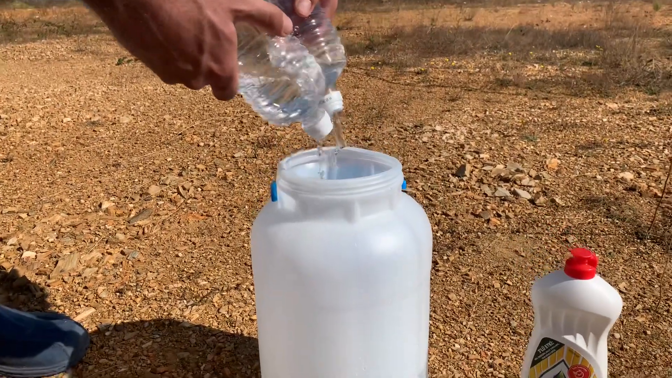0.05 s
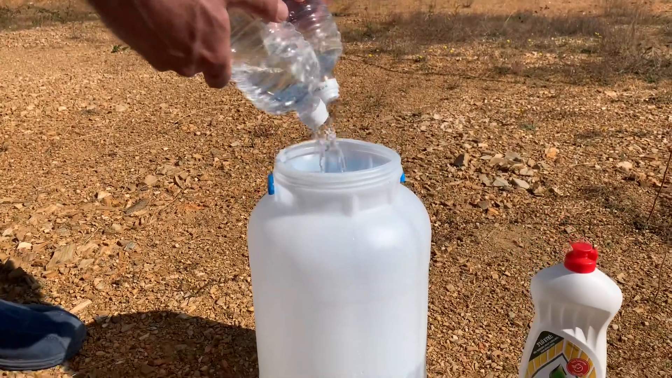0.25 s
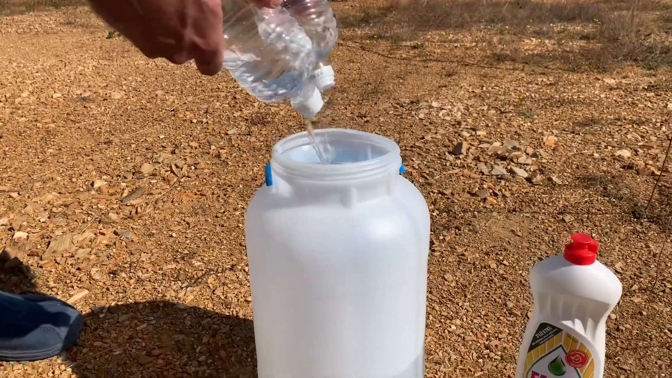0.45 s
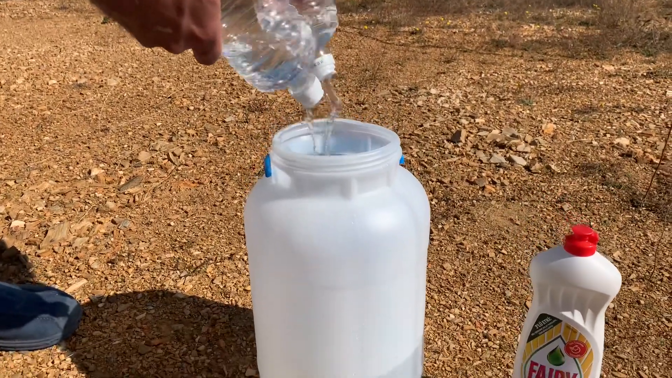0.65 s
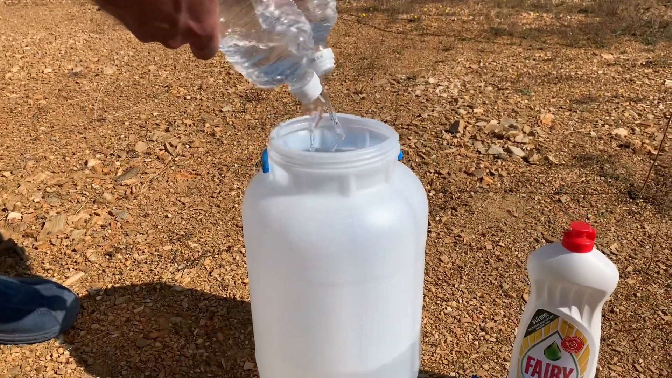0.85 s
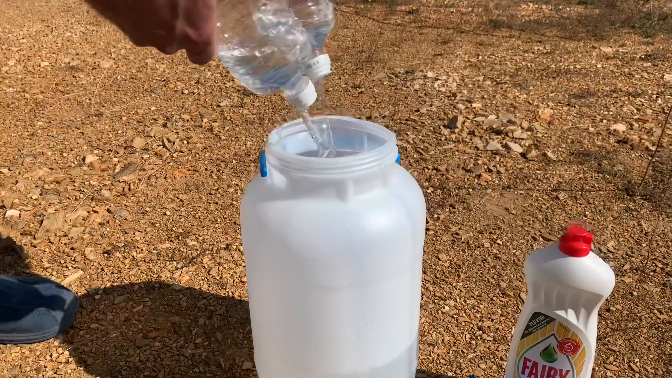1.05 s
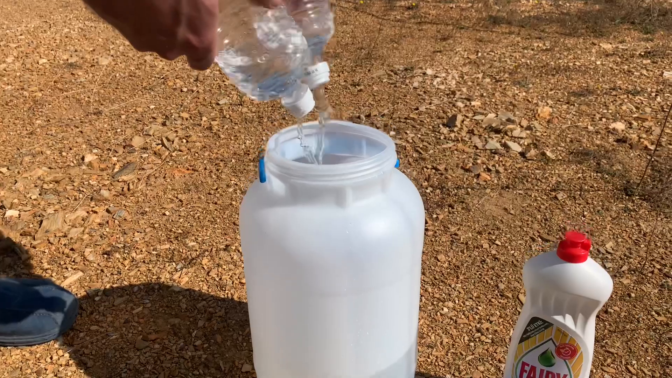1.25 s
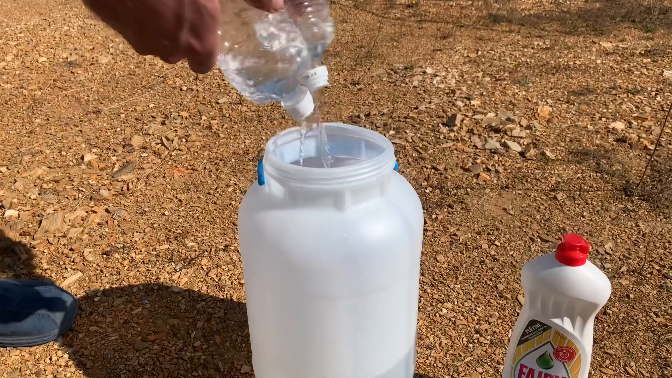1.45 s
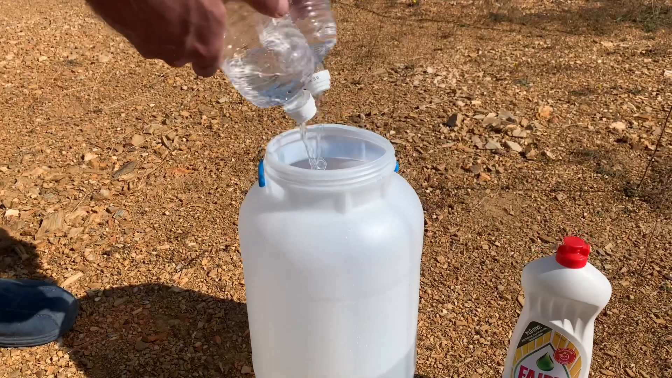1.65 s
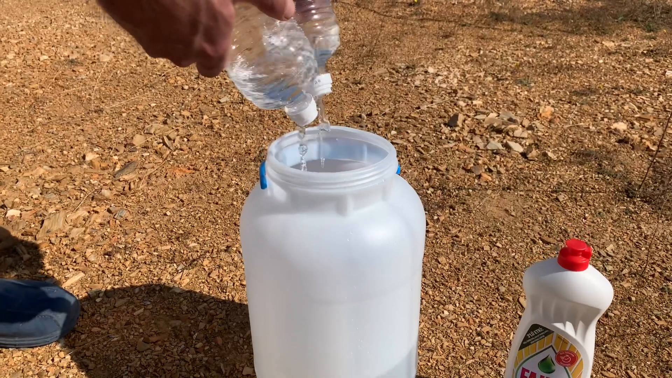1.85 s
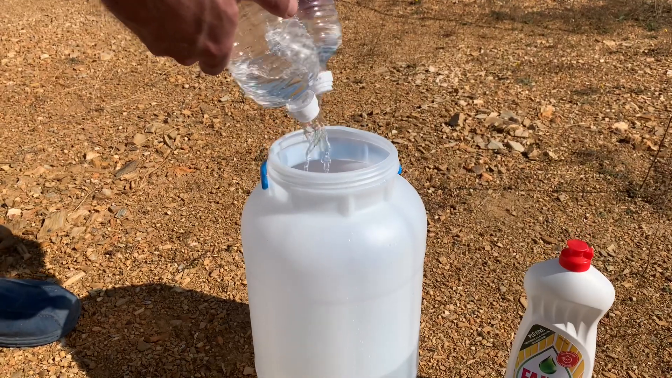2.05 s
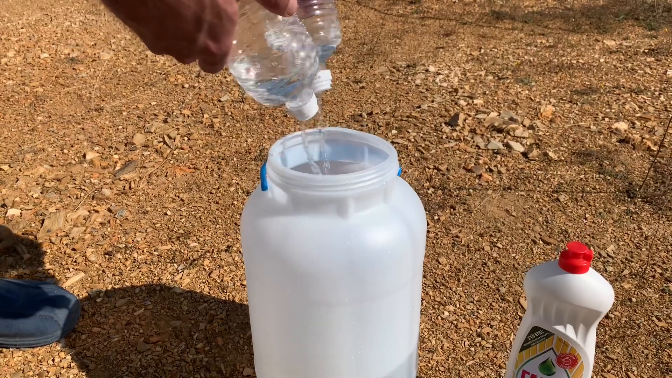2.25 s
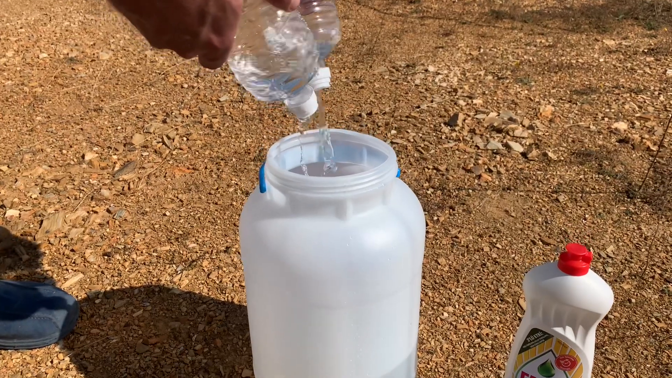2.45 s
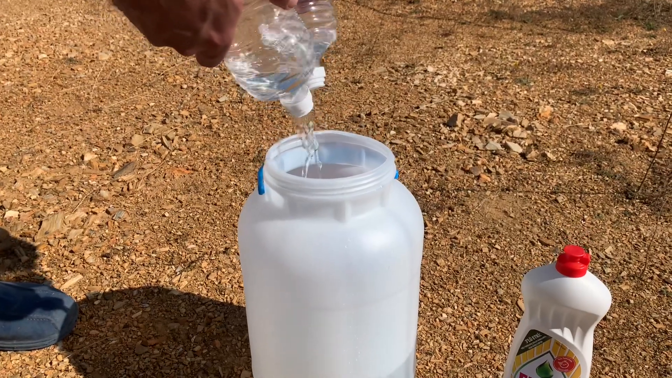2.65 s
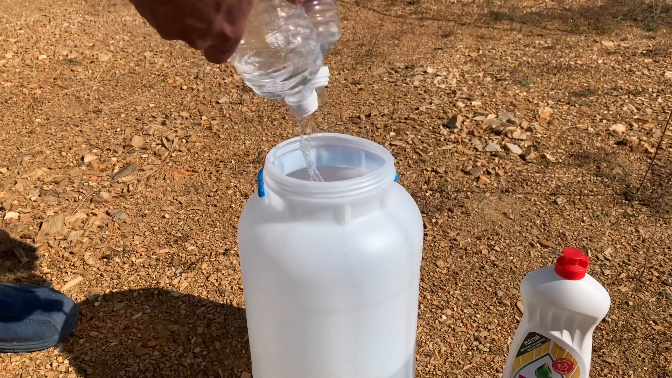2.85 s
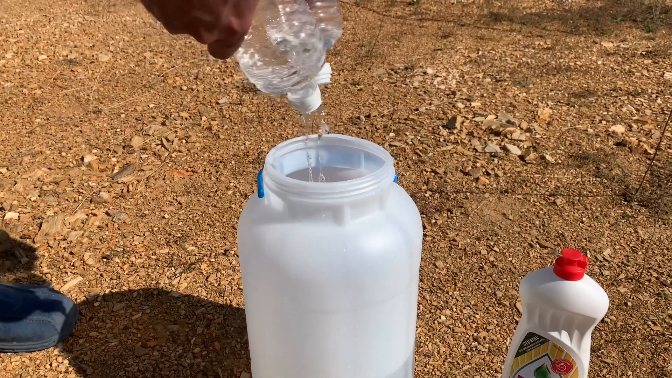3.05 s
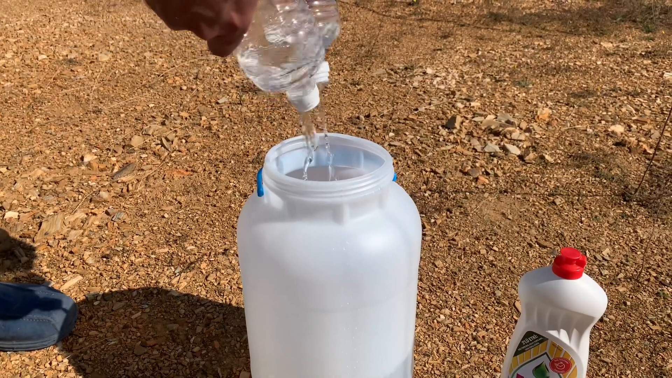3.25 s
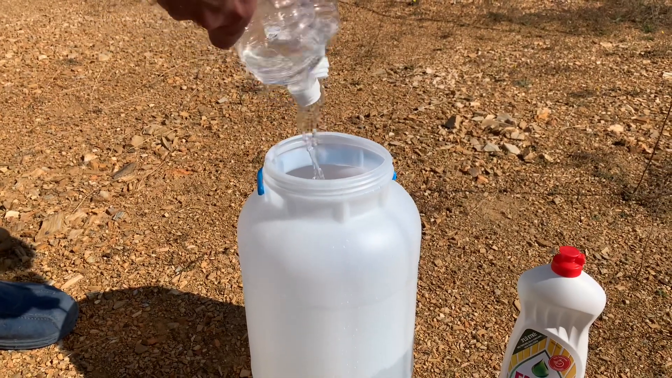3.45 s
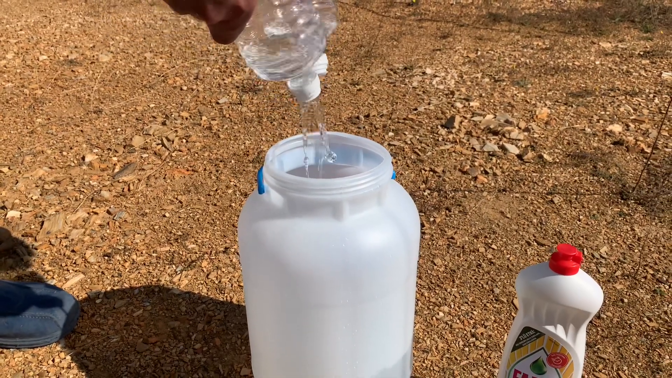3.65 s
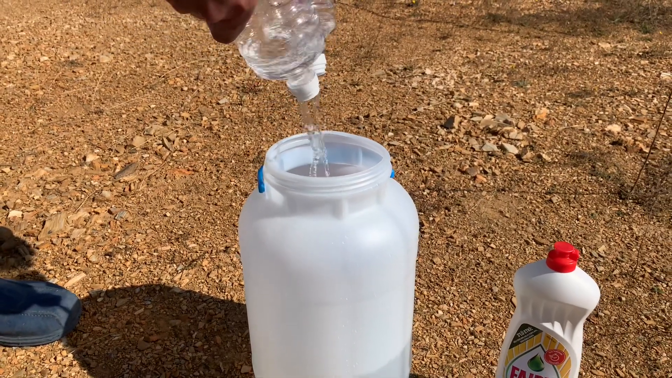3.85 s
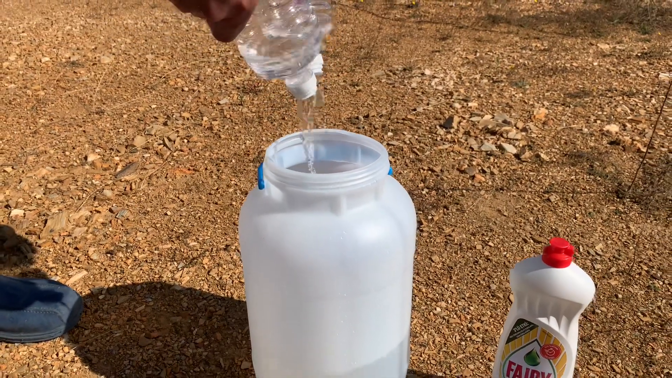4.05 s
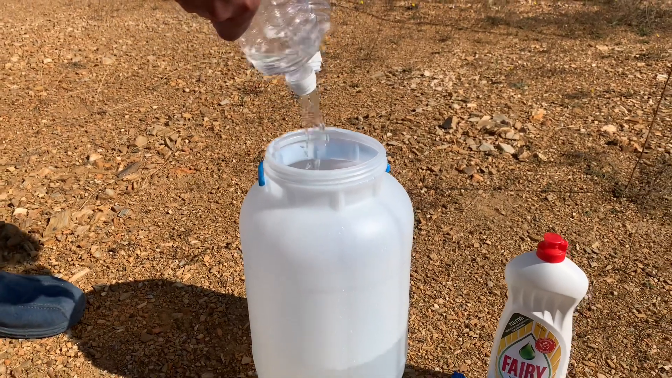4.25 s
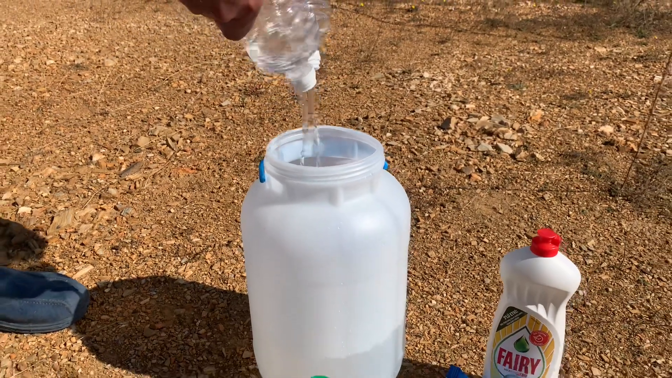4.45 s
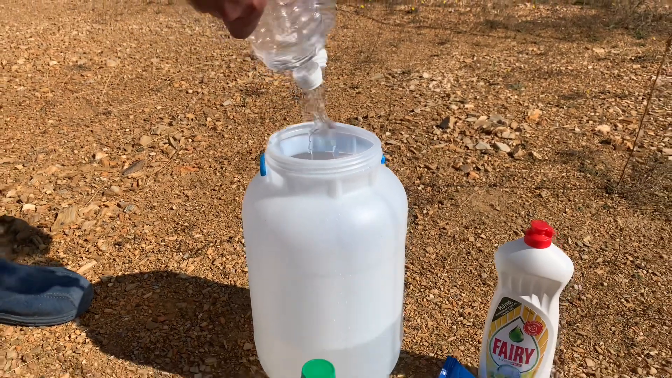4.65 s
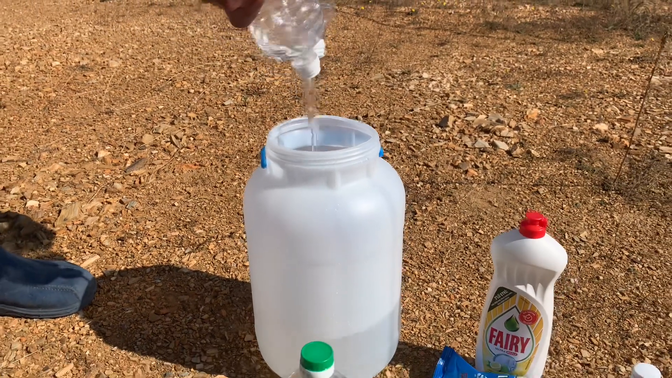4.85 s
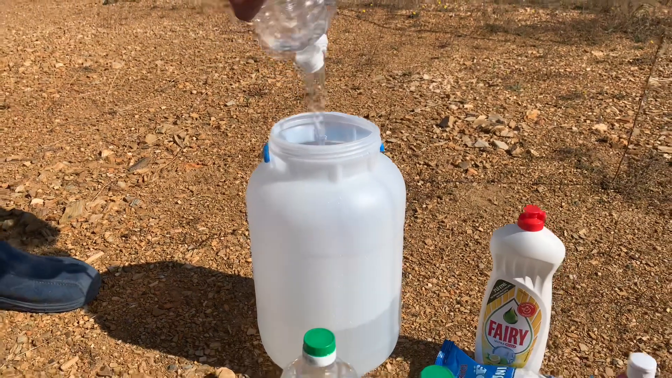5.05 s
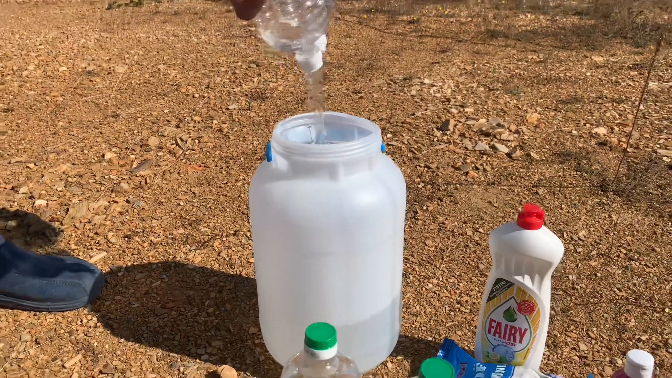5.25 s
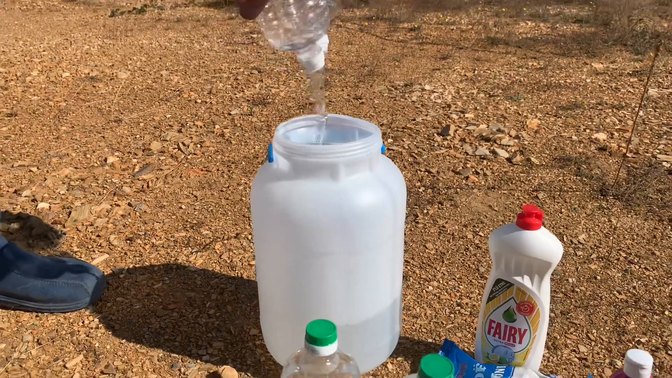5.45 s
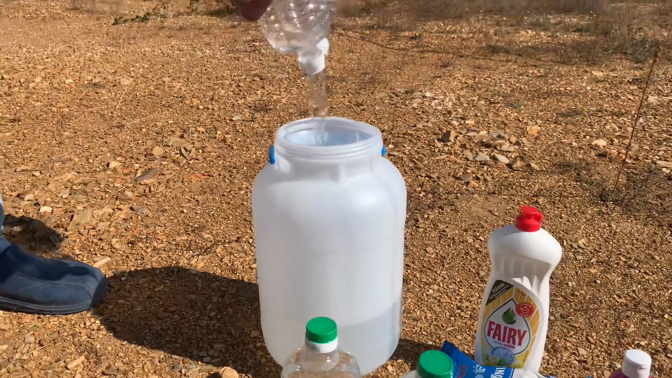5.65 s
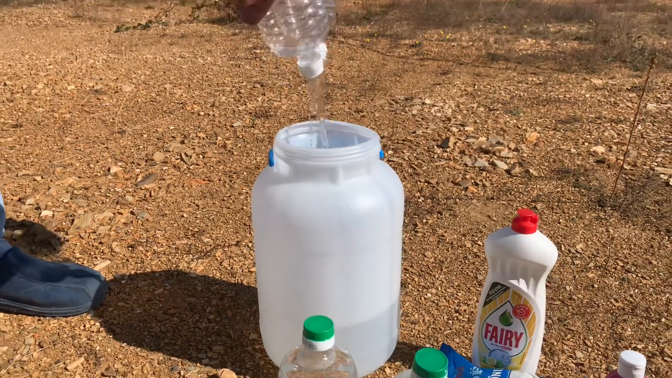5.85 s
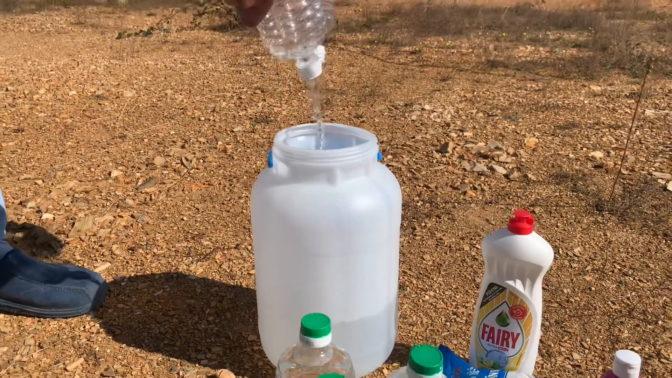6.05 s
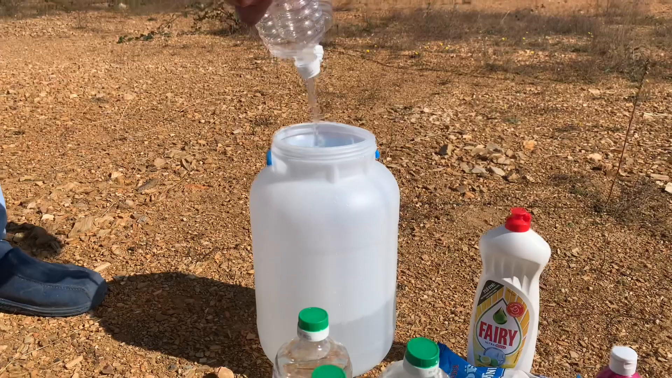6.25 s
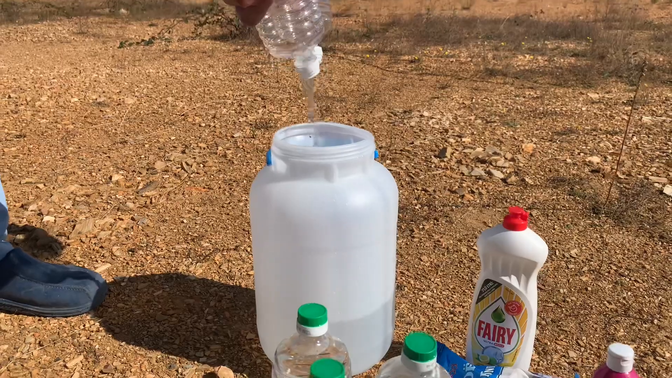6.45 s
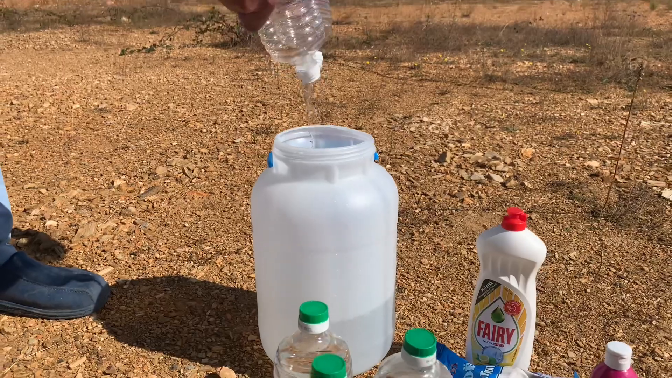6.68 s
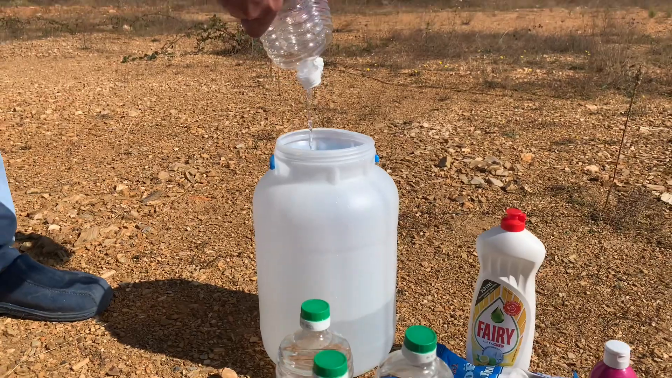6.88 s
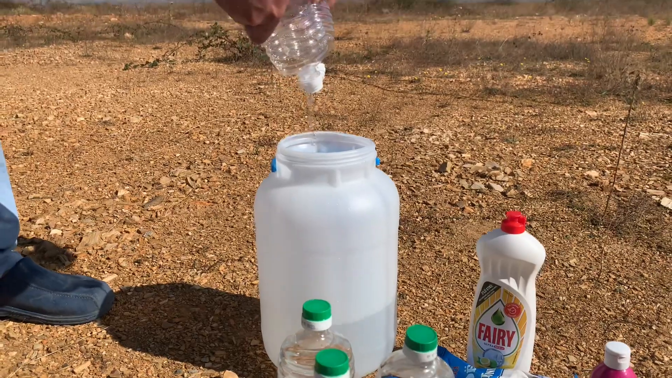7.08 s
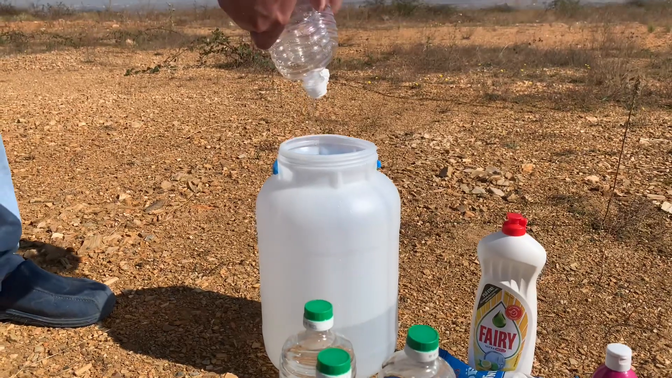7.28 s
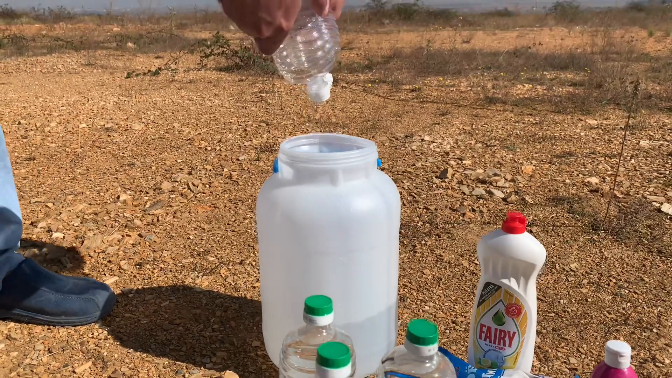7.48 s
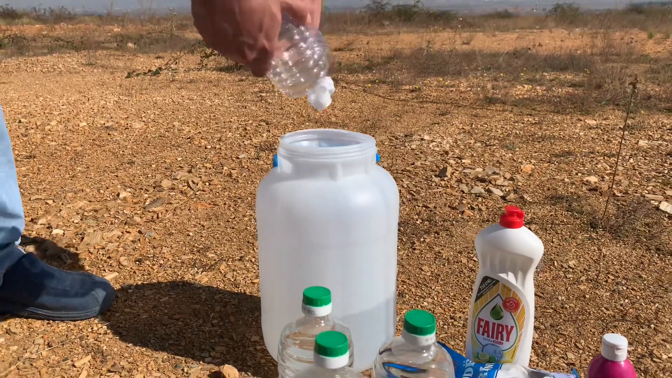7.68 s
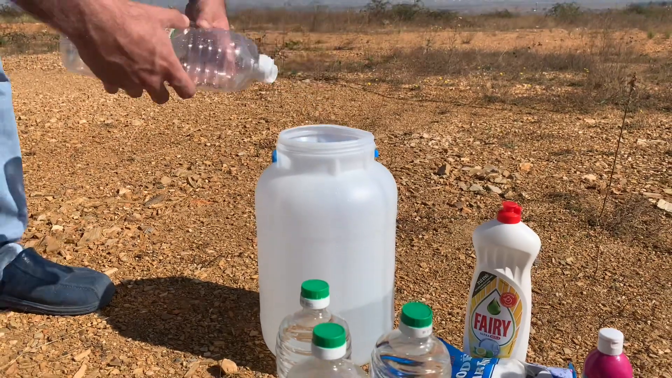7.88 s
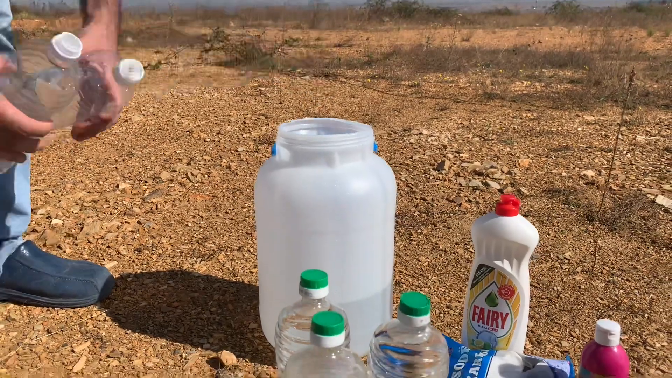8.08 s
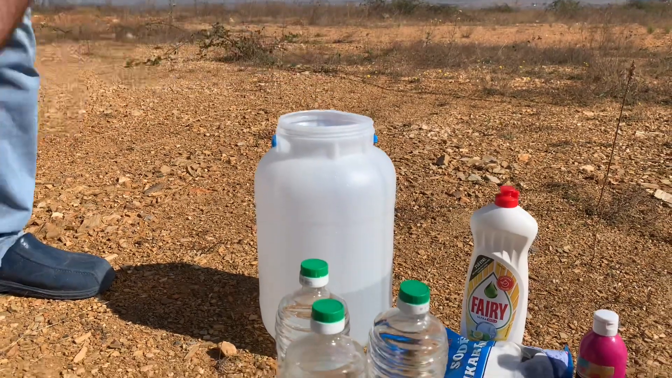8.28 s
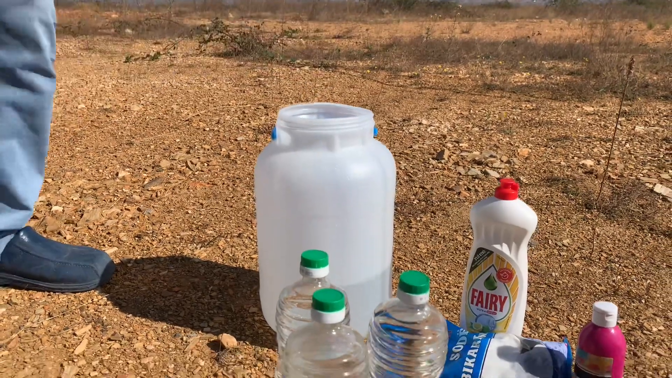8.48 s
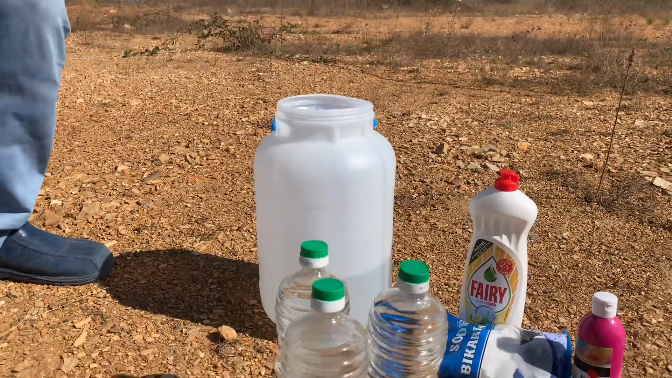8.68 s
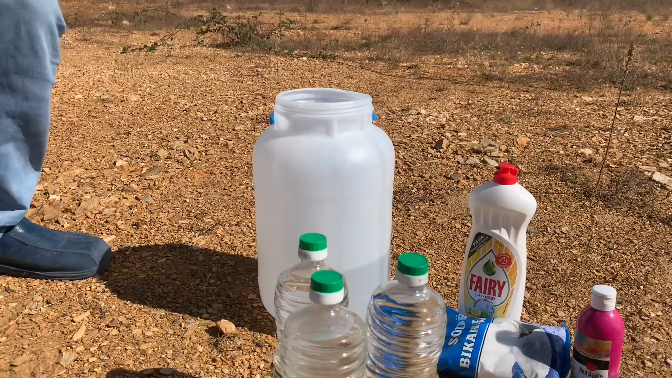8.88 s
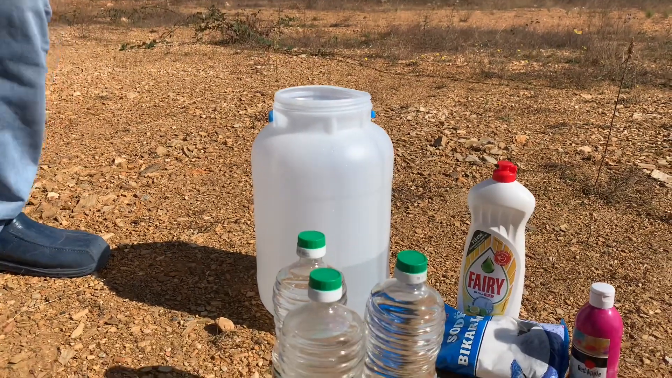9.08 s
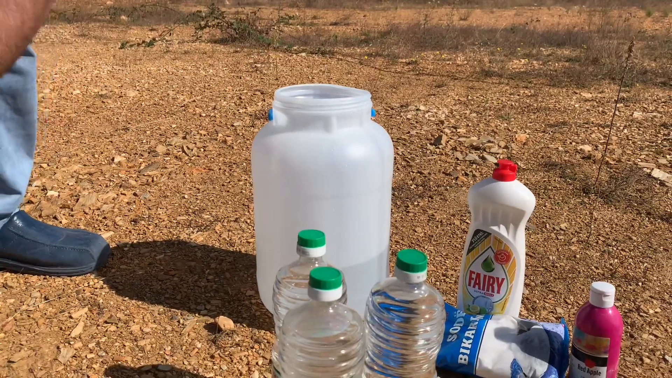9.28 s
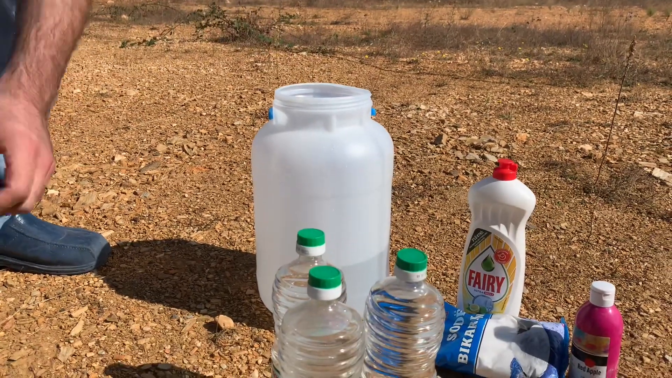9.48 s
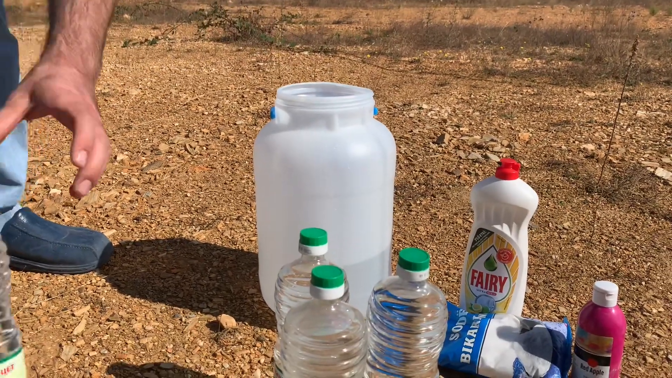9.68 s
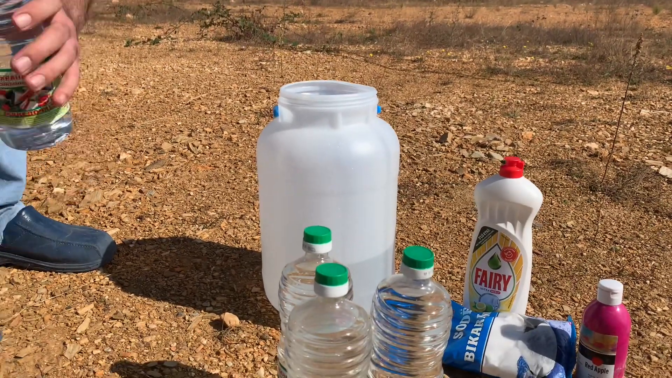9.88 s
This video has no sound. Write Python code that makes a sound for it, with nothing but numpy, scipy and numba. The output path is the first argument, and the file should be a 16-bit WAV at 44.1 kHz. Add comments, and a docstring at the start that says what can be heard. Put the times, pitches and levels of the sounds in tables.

```python
"""Outdoors in a light breeze, water pours from a plastic bottle into a big plastic jug on stony ground. The
stream gulps, splashes as noise bursts and traps bubbles: short gliding sines that ring in the jug's hollow. It
sags, then thins to drips of splattering grit. The last water sloshes in the bottle and shoes grind gravel, as
shaped noise, while the bottle crackles, then drops and bounces with cracks of noise and decaying modes. Soft
low bumps, short decaying sines, come now and then, most of them near the end."""
import sys
import numpy as np
from scipy import signal
from scipy.fft import rfft, irfft
from scipy.io import wavfile
from scipy.ndimage import uniform_filter1d
from numba import njit

SR = 44100
rng = np.random.default_rng(int(sys.argv[2]) if len(sys.argv) > 2 else 0)


def int16_out(signal):
    """Quantize to a 16-bit WAV file."""
    q = np.round(np.clip(np.atleast_2d(signal).T, -1, 1) * 32767)
    wavfile.write(sys.argv[1], SR, q.astype(np.int16))


N = 437472
T = np.arange(N) / SR

# Levels in the tables are mix settings; the functions trim, colour and echo them further.
# loudest bubbles: (time [s], pitch [Hz], level [dB], glide [octaves/s])
BUBBLES = [(.077, 565, -30.5, -20), (.123, 2126, -26, -6), (.142, 550, -34, -40), (0.175, 452, -29.5, -4),
           (.179, 1960, -32, -1), (.297, 564, -36, 10), (.487, 870, -33, 7), (.564, 2070, -30.5, -2),
           (0.798, 890, -31.5, 9), (.883, 2150, -31, -2), (.932, 2470, -28, 3), (.312, 902, -30, 4.5),
           (0.341, 427, -29, 1), (.444, 1920, -23.5, 23), (0.521, 346, -33.5, 17), (.802, 543, -29.5, 9),
           (.912, 773, -24.5, 5), (1.066, 720, -27, 12.5), (1.296, 350, -33.5, 3), (1.409, 535, -30.5, -39),
           (1.55, 1710, -23.5, 29), (1.303, 940, -33, 4), (1.372, 4840, -26, -1), (1.547, 710, -31, 5),
           (1.657, 2960, -29, 5), (1.695, 870, -21.5, 6.5), (1.727, 658, -28, 3), (1.769, 1357, -27.5, 4),
           (1.845, 522, -23.5, 16), (1.958, 2170, -28.5, -21), (2.1, 2140, -31.5, 5), (2.453, 1880, -36, 1),
           (2.522, 2180, -29.5, 6), (2.204, 930, -33, 21), (2.344, 2070, -30, 3), (2.383, 740, -24, -25),
           (2.398, 974, -26.5, 0.5), (2.6, 366, -28.5, 1), (2.815, 945, -31, -15), (2.673, 5960, -26, 5),
           (2.781, 3800, -28.5, -3), (3.06, 384, -34.5, -8), (3.134, 1825, -24, 52), (3.21, 546, -28, 8.5),
           (3.333, 443, -33, 11), (3.729, 1920, -29.5, -5), (3.913, 3740, -25.5, 7), (4.05, 402, -33, -5),
           (4.095, 3600, -30.5, 2), (3.646, 366, -31.5, -3), (3.804, 646, -31.5, 9),
           (3.913, 2440, -26.5, 1), (3.953, 860, -31.5, 10), (4.162, 1140, -35, 12),
           (4.772, 498, -28.5, -14), (4.923, 1280, -27.5, 14), (4.483, 2120, -30, 2), (4.673, 3870, -25, 9),
           (4.727, 1095, -29.5, 2), (4.97, 3680, -26, 12), (5.01, 560, -32.5, -24), (5.173, 2130, -33, -1),
           (5.455, 3450, -27, 8), (5.492, 1421, -31.5, -3), (5.67, 1410, -30.5, 10),
           (5.93, 1080, -34.5, 15), (4.484, 900, -31.5, 5), (4.935, 608, -27, 7.5), (5.378, 843, -32.5, -3),
           (5.654, 825, -29, 12.5), (5.82, 450, -33.5, 6.5), (5.856, 996, -23.5, 2.5),
           (5.856, 1360, -24, -5), (6.141, 850, -31.5, 14.5), (6.328, 812, -34, 16), (6.554, 790, -36, 10),
           (6.685, 824, -35, 21), (6.115, 3570, -23, 15), (6.313, 1420, -32.5, 0), (6.511, 1610, -36.5, 10),
           (6.935, 523, -36, 9), (6.89, 1650, -41, -12), (6.696, 890, -40, 0), (6.804, 737, -41, 17),
           (6.378, 2240, -38, 14), (6.918, 794, -34.5, -2), (7.114, 590, -27, 21.5), (7.162, 855, -39, -10),
           (7.196, 900, -39, 8), (7.332, 1005, -36.5, 3)]
# loudest lumps of water that slap the surface: (time [s], spray level [dB], slap level [dB])
SPLASHES = [(0.298, -40, -30.5), (0.533, -47, -30), (0.652, -33, -48), (0.91, -32, -28), (0.96, -32.5, -40),
            (1.299, -36.5, -65), (1.367, -33.5, -55), (1.587, -23.5, -57), (1.63, -30.5, -55),
            (1.776, -33.5, -36.5), (1.845, -36.5, -51), (1.958, -32, -67), (2.202, -32.5, -34),
            (2.341, -35, -63), (2.472, -32, -65), (2.546, -31, -34.5), (2.671, -29, -47), (2.889, -29, -62),
            (3.046, -35.5, -33), (3.138, -40, -44), (3.209, -29.5, -64), (1.067, -55, -41),
            (3.284, -31.5, -34.5), (3.336, -34.5, -45), (3.435, -41, -32), (3.588, -35, -32),
            (3.673, -29, -35.5), (3.915, -41, -38), (3.955, -36.5, -39), (4.162, -33.5, -28),
            (4.343, -38, -35.5), (4.384, -57, -31), (4.483, -42, -37), (4.679, -59, -34.5),
            (0.442, -51, -31), (4.824, -29.5, -65), (4.884, -31, -52), (4.942, -40, -41),
            (5.457, -33.5, -39), (5.528, -63, -32), (5.86, -57, -30.5), (5.922, -41, -46),
            (6.141, -32, -36), (6.253, -55, -32.5), (6.672, -33, -47), (6.799, -49, -47.5),
            (6.915, -43, -50), (7.037, -46, -56), (7.116, -58, -62), (7.195, -47, -61), (7.332, -71, -42)]
# crackles, then bounces of the empty bottle:
# (time [s], crack level [dB], dull clack level [dB], hollow ring level [dB])
KNOCKS = [(7.549, -50.5, -86, -65), (7.789, -57, -53, -76), (7.904, -57.5, -44.5, -59),
          (8.003, -54, -39.5, -45), (8.016, -48, -43, -51), (8.08, -82, -76, -39),
          (8.219, -42.5, -42.5, -55), (8.382, -53, -53, -52), (8.559, -52, -55, -38),
          (8.788, -49.5, -41, -53), (8.793, -52, -55, -37.5), (8.979, -29.5, -50, -29.5),
          (8.987, -41, -44, -47), (9.002, -41, -42, -40.5), (9.048, -44.5, -64, -42),
          (9.106, -36, -46, -33), (9.163, -37, -47, -40), (9.204, -40.5, -44.5, -37.5),
          (9.235, -45, -50, -44.5), (9.34, -59, -52, -50.5), (9.392, -60, -66, -52.5)]
# dull colour of soft contacts: (frequency [Hz], level [dB])
DULL_COLOUR = [(250, -1.5), (480, -1), (950, 0.5), (1500, -8), (2500, -23.5), (8000, -27)]
POUR_ENDS_S = 7.05
ASIDE_LEAD_S = 0.000265  # bottle and shoes are off to the left, so the left port hears them first


def undb(db):
    """Decibels to gain."""
    return 10 ** (np.asarray(db) / 20)


def unit(x):
    """Scale to rms 1."""
    return x / np.sqrt(np.mean(x ** 2))


def curve(table):
    """A (time, value) table drawn as straight lines, one value a sample."""
    return np.interp(T, *np.transpose(table))


def shape(points, size):
    """A (Hz, value) table on the frequency bins of a sound of this size."""
    hz, value = np.transpose(points)
    bins = np.fft.rfftfreq(size, 1 / SR)
    return np.interp(np.log(bins + 1), np.log(hz + 1), value)


def colour(x, points):
    """Filter by a (Hz, dB) spectrum; rms 1."""
    return unit(irfft(rfft(x) * undb(shape(points, len(x))), len(x)))


def add(out, s, x):
    """Mix x into out from time s."""
    i = int(np.clip(s * SR, 0, N - 1))
    out[i:i + len(x)] += x[:N - i]


def fade(t, t60):
    """Exponential decay that loses 60 dB in t60 seconds."""
    return np.exp(-np.log(1000) * t / t60)


def swell(middle, half_length):
    """A smooth rise and fall around a middle time."""
    return np.exp(-((T - middle) / half_length) ** 2)


def flutter(rate, depth_db):
    """A gain that wanders by chance about rate times a second; rms 1."""
    steps = rng.standard_normal(int(T[-1] * rate) + 1)
    wander = np.interp(T * rate, np.arange(len(steps)), steps)
    return unit(undb(depth_db * wander))


def grit(rate, spread_db, bed):
    """Random clicks of very unequal size over a thin hiss."""
    size = undb(spread_db * np.minimum(rng.exponential(size=N), 4))
    clicks = (rng.random(N) < rate / SR) * size * rng.choice([-1, 1], N)
    return unit(clicks) + bed * rng.standard_normal(N)


def bursts(times, levels_db, rise, t60, tail_db, tail_t60):
    """Envelope of blows: a quick swell, a short decay and a weaker, longer tail."""
    out, t = np.zeros(N), T[:SR // 2]
    blow = (1 - np.exp(-t / rise)) * (fade(t, t60) + undb(tail_db) * fade(t, tail_t60))
    for s, db in zip(times, levels_db):
        add(out, s, undb(db) * blow / blow.max())
    return out


def ring(hz, t60, glide, onset_cycles):
    """A dying sine with a soft onset that glides in pitch while it is loud."""
    t = np.arange(int(t60 * SR)) / SR
    pitch = hz * 2 ** (glide * np.minimum(t, .4 * t60))
    onset = 1 - np.exp(-t * hz / onset_cycles)
    return onset * fade(t, t60) * np.sin(2 * np.pi * np.cumsum(pitch) / SR)


def scatter(x, t60):
    """Short diffuse echo whose paths change every 20 ms, as the water and the source move."""
    hop, t = SR // 50, T[:SR // 16]
    blocks = np.pad(x, (0, -N % hop)).reshape(-1, hop)
    paths = rng.standard_normal((len(blocks), len(t))) * fade(t, t60)
    paths /= np.linalg.norm(paths, axis=1, keepdims=True)
    out = np.zeros(N)
    for k, echo in enumerate(signal.fftconvolve(blocks, paths, axes=1)):
        add(out, k * hop / SR, echo)
    return out


@njit
def band(x, hz, width, rise):
    """State-variable band-pass with gain 1 at a centre that drifts by about rise Hz per s."""
    y, b, low = np.empty(len(x)), 0., 0.
    g, k = np.tan(np.pi * hz / SR), width / hz
    step = np.pi * rise / SR ** 2
    for i in range(len(x)):
        g += step
        v = (b + g * (x[i] + 1e-18 - low)) * (1 / (1 + g * (g + k)))
        b, low, y[i] = 2 * v - b, low + 2 * g * v, k * v
    return y


def ports(x, diffuse_db, left_lead_s=0):
    """Two microphone ports hear the source with different phase and level, and each its own ground scatter."""
    # phase by which left leads: (frequency [Hz], lead [radians])
    port_phase = [(0, 0), (2000, .2), (2900, 1.6), (4100, 2.1), (5900, 3.4), (7400, 3), (9000, 0),
                  (10100, -.6), (11600, -3.1), (13500, -6.1), (15000, -7)]
    # left minus right: (frequency [Hz], level [dB])
    port_balance = [(100, 0), (500, -1), (1300, 2), (2200, 1), (3000, -0.5), (4600, -7.5), (5800, -5.5),
                    (7200, 0.5), (15000, -0.5)]
    hz, radians = np.transpose(port_phase)
    bins = np.fft.rfftfreq(N, 1 / SR)
    lead = np.interp(bins, hz, radians) + 2 * np.pi * bins * left_lead_s
    # half of the difference goes to each side
    turn = np.exp(.5j * lead) * undb(shape(port_balance, N) / 2)
    pair = irfft(rfft(x) * np.array([turn, 1 / turn]), N)
    return pair + undb(diffuse_db) * np.array([scatter(side, 0.023) for side in pair])


def outdoors():
    """An uneven breeze rumbles on the microphone, partly shared by both ports, over faint open air."""
    # breeze: (time [s], level [dB])
    breeze = [(0, -55), (1.2, -60.5), (1.65, -47.5), (1.86, -69), (2.3, -65), (3.3, -61.5), (4.79, -59),
              (5.54, -50.5), (6.5, -60), (7.5, -58), (8.5, -51.5), (8.74, -57), (9.92, -54.5)]
    # colours of the wind rumble and of the open air: (frequency [Hz], level [dB])
    rumble_colour = [(20, -50), (45, 1.5), (75, 1.5), (130, -9.5), (220, -24.5), (500, -33), (2000, -105)]
    air_colour = [(30, 27.5), (150, 1), (400, -8), (1500, 3), (4000, 5), (7000, -15), (10000, -5),
                  (15000, -35)]
    gusts = undb(curve(breeze) + 3.0) * flutter(rate=8.9, depth_db=2.5)
    wind = np.array([colour(rng.standard_normal(N), rumble_colour) * gusts for _ in range(3)])
    air = np.array([colour(rng.standard_normal(N), air_colour) for _ in range(2)])
    return wind[0] + undb(-10.0) * wind[1:] + undb(-70.5) * air


def bumps():
    """Soft, dull thuds of a few cycles, each with a weaker upper partial."""
    # thuds: (time [s], pitch [Hz], level [dB], t60 [s])
    thuds = [(2.789, 68, -37.5, 0.13), (5.473, 57.6, -18, 0.03), (6.969, 66.3, -32.5, 0.054),
             (7.226, 78.6, -29, 0.088), (7.256, 103, -29.5, 0.084), (7.36, 71, -36, 0.17),
             (7.612, 57.7, -29, 0.15), (7.93, 58.4, -27, 0.093), (8.083, 85, -26.5, 0.25),
             (8.306, 89.7, -27.5, 0.2), (8.529, 93.4, -37.5, 0.24), (8.565, 76.8, -26.5, 0.16),
             (9.19, 96, -42, 0.31), (9.554, 80, -20.5, 0.089), (9.83, 63.8, -29.5, 0.28),
             (9.88, 80, -29.5, 0.16)]
    out = np.zeros(N)
    for s, hz, db, t60 in thuds:
        low = ring(hz, t60, glide=0, onset_cycles=0.33)
        overtone = ring(hz * 1.5, t60, glide=0, onset_cycles=1.0)
        add(out, s, undb(db) * (low + undb(-8) * overtone))
    return out * undb(3.5)


def shoes():
    """Soles grind small stones as the weight shifts, and early on the last water sloshes in the bottle; clothes
    rustle, and a sleeve swishes near the end."""
    # steps, the first two being sloshes of water in the bottle: (middle [s], half length [s], grit level [dB],
    # dull scuff level [dB])
    steps = [(7.835, 0.032, -83, -42.5), (8.017, 0.049, -70, -45.5), (8.293, 0.05, -64.5, -64),
             (8.62, 0.13, -66.5, -58.5), (8.798, 0.038, -61, -57), (9.055, 0.042, -65, -50),
             (9.244, 0.14, -60.5, -50)]
    # colours of gravel, of rustling clothes and of a sleeve swish: (frequency [Hz], level [dB])
    gravel_colour = [(200, 9), (800, 17), (2000, 30), (4000, 22.5), (6000, 15), (9500, -7), (15000, -39)]
    rustle_colour = [(300, 1.5), (1500, -1), (2500, -7.5), (4200, 2), (5200, -9.5), (9000, -3),
                     (12000, -20), (15000, -14.5)]
    swish_colour = [(2000, -19), (9000, 11), (15000, 2)]
    grinding = sum(undb(db) * swell(s, length) for s, length, db, _ in steps)
    dragging = sum(undb(db) * swell(s, length) for s, length, _, db in steps)
    stones = colour(grit(rate=1000, spread_db=4.5, bed=0.79), gravel_colour) * grinding
    scuff = colour(grit(rate=430, spread_db=2.0, bed=0.18), DULL_COLOUR) * dragging * undb(-12)
    swish = colour(rng.standard_normal(N), swish_colour) * swell(9.865, 0.016)
    rustle = colour(grit(rate=1000, spread_db=4.5, bed=0.44), rustle_colour) * swell(8.79, 1.07)
    steps_sound = (stones + scuff) * flutter(rate=60, depth_db=5.5)
    return steps_sound + undb(-70.5) * rustle + undb(-56.5) * swish


def bottle_cracks():
    """Each knock cracks and clacks the thin plastic, which goes on crinkling for a moment."""
    # colour of the crack: (frequency [Hz], level [dB])
    crack_colour = [(200, 2), (1400, -5.5), (2300, 14.5), (2700, 1), (3200, 9), (3800, 6.5), (5500, -6),
                    (9000, -5), (15000, -49)]
    s, crack_db, clack_db, _ = np.transpose(KNOCKS)
    cracks = colour(grit(rate=7200, spread_db=3.5, bed=0.27), crack_colour)
    cracks *= bursts(s, crack_db, rise=0.00038, t60=0.016, tail_db=-19, tail_t60=0.1)
    clacks = colour(rng.standard_normal(N), DULL_COLOUR)
    clacks *= bursts(s, clack_db, rise=0.00039, t60=0.016, tail_db=-19, tail_t60=0.17)
    return cracks + clacks


def bottle_ring():
    """Each knock rings the bottle's modes in new shares; the dented wall springs back and the pitch sags."""
    # modes of the empty bottle, scattered a little at each knock: (frequency [Hz], level [dB], t60 [s])
    bottle_modes = [(139.3, 7.5, 0.19), (177, 7, 0.098), (227.6, 4, 0.29), (310.5, 3, 0.16),
                    (364.3, 1, 0.24), (606, -12, 0.18), (884, -13, 0.2)]
    let_go_s, ring_lag_s = 8.9, 0.00691  # the ring lags behind the crack
    flex_share, flex_t60_s = 0.052, .15  # pitch rise of a dented wall, and its recovery
    out, t = np.zeros(N), T[:SR // 2]
    turns = np.cumsum(1 + flex_share * (fade(t, flex_t60_s) - .5)) / SR
    for when, _, _, db in KNOCKS:
        modes = np.zeros(len(t))
        for hz, mode_db, t60 in bottle_modes:
            gain = undb(mode_db + 1.9 * rng.standard_normal())
            mode_hz = hz * (1 + 0.016 * rng.standard_normal())
            modes += gain * fade(t, t60) * np.sin(2 * np.pi * mode_hz * turns)
        # the hand damps the bottle until it drops
        held = fade(t, 0.25) if when < let_go_s else 1
        onset = 1 - np.exp(-t / 0.0028)
        add(out, when + ring_lag_s, undb(db - 5.5) * modes * held * onset)
    return out


def hollow(x, ring_db, echo_db, echo_t60):
    """The jug scatters sound between its walls and rings at its air modes, most of which climb as it fills."""
    # air modes at the start: (frequency [Hz], width [Hz], level [dB], rise [Hz/s])
    air_modes = [(240.6, 45, 11.5, -2), (350, 39, -3, 4), (460, 24, -8, 11), (805, 26, -7, 4),
                 (904, 59, 8, 1.5), (1411, 16, 5.5, 2.5), (1982, 36, 7.5, 12.5), (2180, 130, 5.5, 0.5),
                 (2533, 30, 9.5, 6.5), (3013, 14, 11.5, 8.5), (3347, 22, 4, 9.5), (3790, 75, -0.5, 7)]
    x = x + undb(echo_db) * scatter(x, echo_t60)
    rings = [undb(ring_db + db) * band(x, float(hz), float(width), float(rise))
             for hz, width, db, rise in air_modes]
    return x + sum(rings)


def mouth(x):
    """Some pitches cancel on their way out of the jug."""
    # cancelled pitches at the start: (frequency [Hz], width [Hz], level [dB], rise [Hz/s])
    gaps = [(300, 20, -8.5, -3), (1025, 380, -2, 39), (1560, 38, -0.5, -5), (1847, 53, -7.5, 14),
            (2612, 166, -22, -2), (3210, 135, -15, -9)]
    for hz, width, db, rise in gaps:
        x = x + (undb(db) - 1) * band(x, float(hz), float(width), float(rise))
    return x


def flow_db(t):
    """Strength of the stream relative to full flow: it sags as the bottle empties, then thins to drips."""
    sag_db_per_s, thins_s, thin_db_per_s = 0.5235, 5.85, 13.5
    return -sag_db_per_s * t - thin_db_per_s * np.clip(t - thins_s, 0, None)


def pouring():
    """1 while the stream runs, falling to 0 as it breaks off."""
    last_drips_s = 0.21
    return 1 / (1 + np.exp((T - POUR_ENDS_S) / last_drips_s))


def drum_swell_db():
    """How much harder than usual the stream drums on the pool."""
    # spells of harder drumming: (middle [s], half length [s], extra level [dB])
    spells = [(0.602, 0.25, 8.5), (4.97, 0.25, 19.5), (6.192, 0.064, 13)]
    return sum(db * swell(s, length) for s, length, db in spells)


def drumming():
    """The falling water drums on the pool and sounds the jug's lowest air modes."""
    drum_colour = [(100, -9.5), (200, -5.5), (228, 15.0), (260, -0.5),
                   (320, -8.0), (367, -3), (470, -13), (900, -43)]  # (frequency [Hz], level [dB])
    drum = colour(grit(rate=200, spread_db=7.0, bed=0.12), drum_colour)
    return drum * undb(-62.5 + flow_db(T) + drum_swell_db())


def swarm(count, low_hz, high_hz, cycles, spread_db, rise, shrink_per_s=0):
    """Many chance bubbles; small ones ring higher and shorter, most rise, and a weaker stream can trap no big ones."""
    shrinks_s, stray_octaves = 5.09, 0.37  # when bubbles start to shrink; scatter of their pitch
    out = np.zeros(N)
    for when, size, life, loud, depth, stray in rng.random((count, 6)):
        s = when * T[-1]
        lowest = low_hz * 2 ** (shrink_per_s * max(s - shrinks_s, 0))
        hz = lowest * (high_hz / lowest) ** size * 2 ** (stray_octaves * (stray - .5))
        t60 = cycles * (.5 + life) / hz
        bubble = ring(hz, t60, glide=rise * (depth - .3) / t60, onset_cycles=1.0)
        add(out, s, undb(spread_db * loud ** 3) * bubble)
    return unit(out)


def churn():
    """Lesser bubbles bob up all the time and crowd in after every plunge."""
    s, db = np.vstack([np.array(BUBBLES)[:, ::2], np.array(SPLASHES)[:, ::2]]).T
    stirred = bursts(s, db - 23, rise=0.0014, t60=0.11, tail_db=-13, tail_t60=0.97)
    # even the hardest plunge stirs up no more than this
    ceiling = undb(-47)
    stirred = ceiling * np.tanh(stirred / ceiling)
    # harder drumming adds a little to the bubbling
    steady = undb(-52 + flow_db(T) + 0.11 * drum_swell_db())
    medium = swarm(count=1300, low_hz=347.6, high_hz=1068, cycles=23.5, spread_db=17.0, rise=0.8,
                   shrink_per_s=0.22)
    small = swarm(count=3200, low_hz=1092, high_hz=2420, cycles=14.7, spread_db=17.5, rise=1.0)
    lesser = medium * undb(-7.0) + small * undb(-9.0)
    lesser = lesser * np.hypot(steady, stirred) * flutter(rate=45, depth_db=3)
    return hollow(lesser, ring_db=2.5, echo_db=-2.5, echo_t60=0.016)


def splatter():
    """Beads of water smack the pool: all along while the stream runs, in bursts once it breaks into drips."""
    # drips of the breaking stream: (time [s], level [dB])
    drips = [(6.255, -44.5), (6.32, -47.5), (6.385, -49), (6.507, -51), (6.553, -63), (6.62, -56.5),
             (6.669, -49.5), (6.802, -54), (6.917, -56), (6.975, -53), (7.024, -54.5)]
    # colour of beads hitting the pool: (frequency [Hz], level [dB])
    bead_colour = [(200, -11), (500, 5), (1000, 4.5), (1700, -2.5), (3000, -2), (4400, -1.5), (5500, -37),
                   (15000, -26)]
    drip_t60_s = .11  # how long the beads of one drip keep falling
    running = colour(grit(rate=260, spread_db=5.5, bed=0.063), bead_colour)
    running *= undb(-58 + flow_db(T)) * pouring()
    dripping = colour(grit(rate=1500, spread_db=1.0, bed=0.23), bead_colour)
    dripping *= bursts(*np.transpose(drips), rise=0.00055, t60=drip_t60_s, tail_db=-16, tail_t60=2 * drip_t60_s)
    return running + hollow(dripping * undb(-2.5), ring_db=-4, echo_db=-10, echo_t60=.03)


def lesser_lumps(count, mean_db, spread_db):
    """Chance lumps in the stream, as (times, levels in dB); they weaken with the flow."""
    place, size = rng.random((count, 2)).T
    s = (np.arange(count) + place) / count * POUR_ENDS_S
    return s, mean_db + spread_db * (size - .5) + flow_db(s)


def spray():
    """Droplets and tiny bubbles crackle in the jug, flaring at every slap of the stream."""
    # fizz at full flow: (time [s], level [dB])
    fizz_level = [(0, -58.5), (.33, -45), (1.1, -45.5), (1.35, -41), (1.9, -57), (2.58, -65), (2.72, -37.5),
                  (2.87, -58), (3.26, -55), (3.4, -42.5), (4.37, -43), (4.58, -48), (5, -39), (5.3, -49),
                  (5.5, -40.5), (6.3, -45), (6.55, -57.5), (7.5, -50.5)]
    # single drops that tick on the jug's rim: (time [s], level [dB])
    rim_drops = [(2.246, -22.5), (3.603, -19), (3.677, -34), (5.455, -19), (5.856, -41), (6.115, -27.5)]
    # colours of the droplets and of the slap: (frequency [Hz], level [dB])
    spray_colour = [(150, 2.5), (500, -8.5), (2700, -4), (3700, -9.5), (5500, -3), (8500, 9), (11000, 2.5),
                    (15000, 0.5)]
    slap_colour = [(200, 0.5), (600, -24), (1000, 5), (1600, 4.5), (2150, -3), (2800, 3), (3800, 1.5),
                   (5500, -1.5), (9000, -20), (15000, -49)]
    foam_colour = [(1500, -47), (2800, -2.5), (4500, -1), (6300, 6.5), (7500, -4.5), (12000, -33)]
    sag_share = 0.57  # a thin stream breaks into drops, so the spray sags less than the flow

    s, db = lesser_lumps(count=30, mean_db=-49.0, spread_db=13)
    s, flare_db, slap_db = np.hstack([np.transpose(SPLASHES), [s, db, db]])

    drops = colour(grit(rate=3600, spread_db=5.0, bed=0.25), spray_colour) * undb(-52.5)
    fizz = swarm(count=5000, low_hz=2890, high_hz=6900, cycles=14.3, spread_db=13.5, rise=0.19)
    # the finest foam merges into a hiss
    foam = colour(grit(rate=6000, spread_db=1.5, bed=0.44), foam_colour)
    fizz = (undb(-9.0) * fizz + undb(-8.5) * foam) * undb(curve(fizz_level))
    wash = (drops + fizz) * undb(sag_share * flow_db(T)) * flutter(rate=55, depth_db=4.5)

    # stray droplets land just before and after the main lump
    patter = bursts(s, flare_db - 39.0, rise=0.0018, t60=0.0081, tail_db=-22, tail_t60=0.041)
    patter = uniform_filter1d(patter, size=1300)
    flare = bursts(s, flare_db - 7.5, rise=0.0017, t60=0.024, tail_db=-23.0, tail_t60=0.19)
    flare = colour(grit(rate=2200, spread_db=-0.5, bed=0.16), spray_colour) * (flare + patter)
    slap = colour(grit(rate=3600, spread_db=-3.0, bed=0.049), slap_colour)
    slap *= bursts(s, slap_db - 10.5, rise=0.00096, t60=0.044, tail_db=-13, tail_t60=0.13)
    ticks = colour(rng.standard_normal(N), spray_colour)
    ticks *= bursts(*np.transpose(rim_drops), rise=.0001, t60=0.004, tail_db=-32, tail_t60=0.013)

    mix = wash * np.sqrt(pouring()) + splatter() + flare + slap + undb(-10.5) * ticks
    return hollow(mix, ring_db=-6.0, echo_db=-1.5, echo_t60=0.024)


def gulp(low_hz, end_hz, length, lead):
    """A hollow in the water sinks in pitch as it deepens, then climbs until it closes."""
    u = np.arange(-lead * length, 1.25 * length, 1 / SR) / length  # 0 when deepest, 1 at the final pitch
    pitch = low_hz * (end_hz / low_hz) ** np.minimum(np.abs(u) ** 1.4, 1)
    opens = np.clip(1 + u / lead, 0, 1) ** 2
    closes = undb(-6 * np.maximum(u, 0)) * fade(np.maximum(u - .85, 0), .6)
    return opens * closes * np.sin(2 * np.pi * np.cumsum(pitch) / SR)


def gulps():
    """Gulps waver as the stream keeps hitting their hollow."""
    # hollows: (deepest moment [s], lowest pitch [Hz], final pitch [Hz], climb [s], level [dB])
    hollows = [(.665, 450, 900, 0.068, -43.5), (.862, 473, 866, 0.058, -34.5),
               (1.505, 494.5, 770, 0.054, -41.5), (1.592, 455, 950, .031, -32),
               (1.66, 388, 950, .045, -39.5), (2.335, 452.4, 755, 0.058, -48),
               (2.548, 501, 946, 0.062, -42.5), (2.71, 469, 900, 0.063, -53), (2.928, 462, 970, 0.054, -39),
               (3.243, 836, 1230, .05, -45.5), (3.36, 495, 1006, 0.069, -46),
               (3.54, 643, 1000, .055, -40.5), (3.82, 434, 780, 0.053, -47), (4.085, 354, 595, .06, -43.5),
               (5.16, 550, 940, 0.037, -48), (7.294, 880, 1300, .018, -35.5)]
    lead = .3  # sinking time as a share of climbing time
    out = np.zeros(N)
    for s, low, end, length, db in hollows:
        add(out, s - lead * length, undb(db) * gulp(low, end, length, lead))
    return hollow(out * flutter(rate=170, depth_db=2.5), ring_db=-15, echo_db=-6.5, echo_t60=0.023)


def big_bubbles():
    """Big single bubbles, each born with a wet smack; smaller ones ring higher and shorter."""
    ring_t60_s, ring_hz, ring_power = 0.051, 464, 0.42  # t60 at ring_hz, and how fast it falls with pitch
    rise_hold_s, large_below_hz = 0.0376, 1000  # large bubbles that rise ring longer: share per (octave/s)
    pinch_off_s = 0.00059  # time in which a bubble closes and starts to ring
    smack_colour = [(200, -45), (600, 6), (2200, -5.0), (3500, -4.5), (15000, -43)]  # (Hz, dB)
    big = np.zeros(N)
    for s, hz, db, glide in BUBBLES:
        longer = 1 + rise_hold_s * max(glide, 0) * (hz < large_below_hz)
        t60 = longer * ring_t60_s * (ring_hz / hz) ** ring_power
        add(big, s, undb(db) / np.sqrt(longer) * ring(hz, t60, glide, hz * pinch_off_s))
    s, _, db, _ = np.transpose(BUBBLES)
    smack = colour(rng.standard_normal(N), smack_colour)
    smack *= bursts(s, db - 21.5, rise=0.00082, t60=0.017, tail_db=-30.0, tail_t60=0.11)
    return hollow(big * undb(-3.0) + smack, ring_db=-17, echo_db=-6.5, echo_t60=0.096)


def gurgle():
    """Gulps and big bubbles over the churn and the drumming of the stream."""
    return gulps() + big_bubbles() + (churn() + drumming()) * pouring()


def scene():
    """The pour, then the bottle and the shoes, in the open."""
    water = ports(mouth(gurgle()), diffuse_db=-10.0) + ports(mouth(spray()), diffuse_db=-9.5)
    rough = ports(bottle_cracks() + shoes(), diffuse_db=1, left_lead_s=ASIDE_LEAD_S)
    tonal = ports(bumps() + bottle_ring(), diffuse_db=-21.5, left_lead_s=ASIDE_LEAD_S)
    return water + rough + tonal + outdoors()


def record(dry):
    """The phone cuts the deepest bass and the top."""
    bass_cut = signal.butter(2, 28, "high", fs=SR, output="sos")
    top_cut = signal.ellip(8, .2, 70, 15600, fs=SR, output="sos")
    return signal.sosfilt(top_cut, signal.sosfilt(bass_cut, dry))


dry = scene()
out = record(dry)
int16_out(out)
```